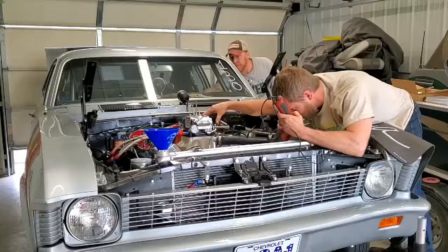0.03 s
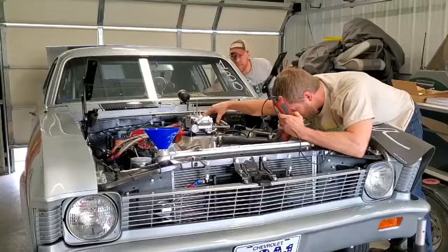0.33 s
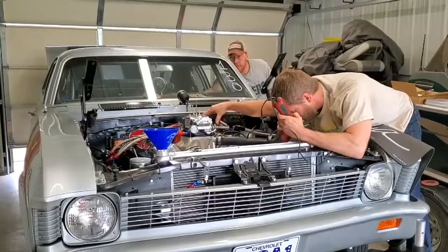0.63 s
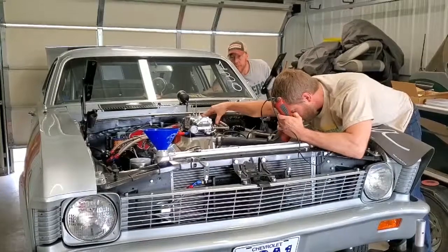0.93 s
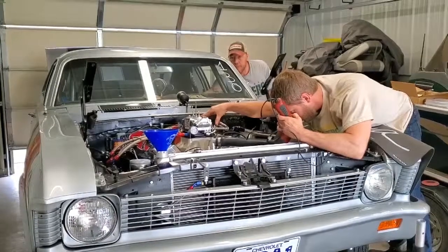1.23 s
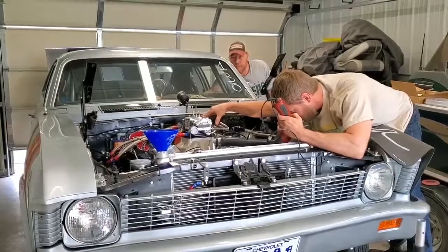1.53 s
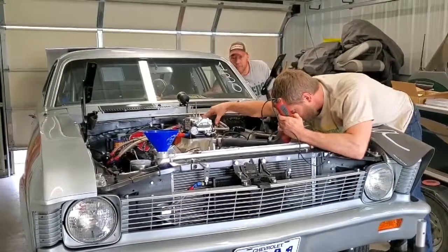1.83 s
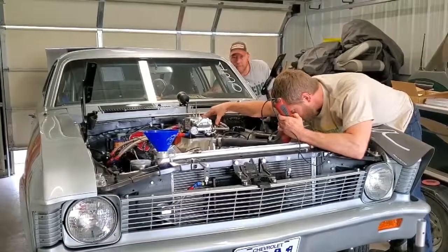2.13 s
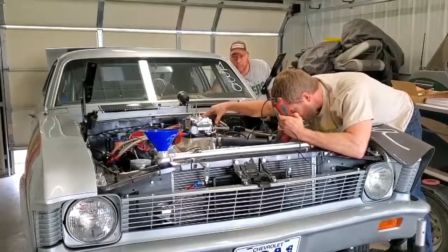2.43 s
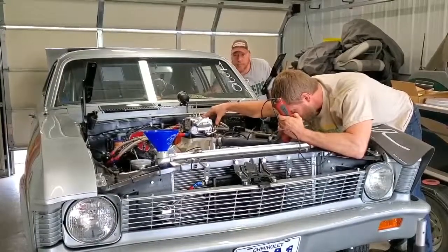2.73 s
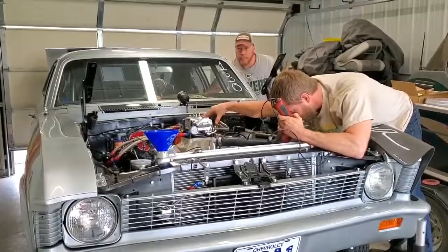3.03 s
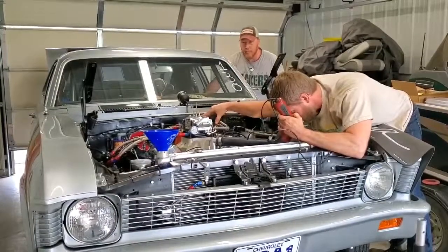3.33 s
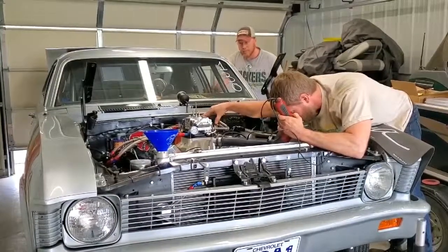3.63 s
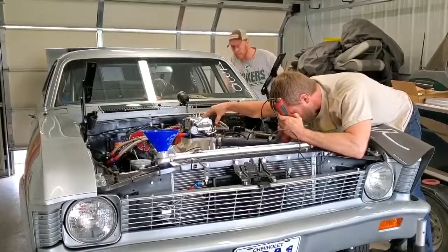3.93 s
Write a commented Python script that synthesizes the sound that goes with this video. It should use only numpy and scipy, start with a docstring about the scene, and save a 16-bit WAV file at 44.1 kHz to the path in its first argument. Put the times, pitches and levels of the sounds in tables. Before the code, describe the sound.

A big V8 car engine starts in a closed garage. The starter clashes in and grinds briefly, then the engine catches and runs loud and lumpy, with deep exhaust booms, hissing intake air and clattering valves nearby.

```python
"""A closed garage, in front of the open bonnet: a big V8 is started.
The pinion clashes in and the starter grinds through a few compressions, ringing the bell housing.
The engine catches, throws the pinion free and runs lumpily on a hand-worked throttle.
Uneven firings boom and bark in the pipes, the open carburettor hisses, the valve gear clatters."""
import sys
import numpy as np
from scipy import signal
from scipy.fft import rfft, irfft
from scipy.io import wavfile
from scipy.ndimage import uniform_filter1d

SR = 44100
rng = np.random.default_rng(int(sys.argv[2]) if len(sys.argv) > 2 else 0)


def log_audio(samples):
    """Write samples as a 16-bit WAV file to the path given in sys.argv[1]."""
    # one column per channel
    frames = np.atleast_2d(samples).T
    # limit to full scale, then quantise
    limited = np.clip(frames, -1, 1)
    pcm = np.round(limited * 32767).astype(np.int16)
    wavfile.write(sys.argv[1], SR, pcm)


N = 176400

# garage air (frequency [Hz], gain [dB])
AIR_SPECTRUM = [(25, -40), (62, 10.5), (130, -1.5), (400, 0.5), (1400, -8.5), (2800, -8), (4500, -16.5),
                (6900, -13.5), (10000, -27)]
# side re mid (frequency [Hz], gain [dB])
STEREO_WIDTH = [(60, -25), (250, -17.5), (500, -7), (1200, -0.5)]
# left re right (frequency [Hz], gain [dB])
STEREO_BALANCE = [(600, -1), (1200, 0.5), (2200, -3), (4000, -0.5), (6900, -6.5), (9000, -2), (11500, 1.5)]

# valve gear (frequency [Hz], gain [dB])
CLATTER_SPECTRUM = [(300, -9.5), (450, 1), (600, -3.5), (950, 0), (1400, -2), (1700, -.5), (2050, -4.5),
                    (2500, .5), (3300, 1), (3950, -9), (4600, -7), (6000, -2.5), (12000, -37.5)]
# intake air (frequency [Hz], gain [dB])
HISS_SPECTRUM = [(3000, -36), (4500, -15), (5700, -16), (6500, -6.5), (7200, -1.5), (8000, -10.5),
                 (10200, -17.5), (11500, -11), (13000, -17)]
# intake hiss (time [s], level [dB])
HISS_LEVEL = [(1.36, -52), (1.41, -21.5), (1.5, -32), (1.77, -34.5), (1.95, -27.5), (2.24, -26.5),
              (2.37, -38), (2.53, -26.5), (2.76, -30.5), (2.87, -38), (2.92, -30), (3.45, -27.5),
              (3.85, -31.5)]
# throttle whistles (time [s], level [dB], pitch [Hz], decay [s])
WHISTLES = [(1.787, -14.5, 7250, 0.04), (2.983, -18.5, 7600, 0.04)]

# starter under load (time [s], level [dB])
GRIND_LEVEL = [(0.515, -45), (0.546, -20.5), (0.59, -19.5), (0.66, -22.5), (0.77, -22.5), (0.846, -29),
               (0.9, -20.5), (0.94, -21), (0.992, -25.5), (1.012, -17), (1.05, -15.5), (1.08, -22.5),
               (1.15, -30), (1.26, -22), (1.29, -16), (1.45, -23)]
# starter spun by the engine (time [s], level [dB])
OVERRUN_LEVEL = [(1.2, -34), (1.29, -33.5), (1.4, -23), (1.47, -27), (1.54, -27.5), (1.74, -27.5),
                 (1.79, -36), (1.9, -59)]
# starter motor (time [s], pitch [Hz], level [dB])
MOTOR_WHINE = [(0.55, 950, -42), (0.75, 940, -34), (0.98, 985, -40), (1.04, 1000, -25), (1.1, 985, -33),
               (1.21, 975, -38), (1.3, 1025, -29)]
# bell housing (frequency [Hz], width [Hz], gain [dB])
HOUSING_MODES = [(980, 33, -1), (1265, 50, 5), (1617, 72, 7), (2286, 110, 10.5), (2510, 64, 10),
                 (2650, 37, -7), (2980, 86, -1)]
# loaded teeth (frequency [Hz], gain [dB])
GRIND_SPECTRUM = [(150, -14.5), (260, -1), (450, -10.5), (650, -7.5), (1000, 0.5), (1500, -3), (3500, 0.5),
                  (4100, -17), (9000, -32)]
# scraping teeth (frequency [Hz], gain [dB])
SCRAPE_SPECTRUM = [(2500, -12.5), (4200, -0.5), (5700, -2), (6700, 4), (8000, -6), (9500, -13.5),
                   (11300, -6), (13000, -22)]
# free-spinning teeth (frequency [Hz], gain [dB])
OVERRUN_SPECTRUM = [(500, -18), (1900, -0.5), (2500, 6), (3500, 9), (4000, 4), (5700, 4.5), (6800, 10.5),
                    (8200, -10.5), (13000, -58)]

# exhaust puffs while cranking (time [s], length [s], level [dB])
CRANKING_PUFFS = [(0.577, 0.25, -31.5), (0.84, 0.17, -37.5), (1.017, 0.16, -28), (1.152, 0.27, -37),
                  (1.3, 0.21, -24.5)]
# rush of a puff (frequency [Hz], gain [dB])
PUFF_SPECTRUM = [(20, -34), (45, 16), (100, 4.5), (400, -32.5)]
# engine speed (time [s], firing rate [Hz])
FIRING_RATE = [(1.4, 66), (1.5, 72), (1.58, 62), (1.7, 66), (1.94, 68), (2.09, 72), (2.25, 85),
               (2.38, 71.3), (2.5, 66), (2.6, 85), (2.7, 90), (2.91, 73), (3.03, 66.9), (3.2, 74),
               (3.35, 80), (3.86, 82), (4.0, 75)]
# eight cylinders in firing order (strength [dB])
CYLINDER_DB = [0.5, -6, -1, -3.5, -8, 1, -9, -1]
# exhaust boom (time [s], level [dB])
BOOM_LEVEL = [(1.38, -27), (1.43, -22), (1.5, -8), (1.54, -22), (1.73, -16.5), (1.78, -31), (1.83, -16),
              (1.89, -24), (2.03, -9.5), (2.13, -17), (2.18, -9.5), (2.29, -13), (2.33, -21), (2.39, -12),
              (2.44, -21), (2.51, -11.5), (2.78, -12), (2.82, -24), (2.93, -10.5), (3.0, -14), (3.1, -7.5),
              (3.15, -14), (3.29, -11), (3.78, -12), (3.85, -18), (3.92, -10)]
# firing force, heard as bark (time [s], level [dB])
BARK_LEVEL = [(1.28, -41), (1.42, -27), (1.49, -18), (1.57, -20.5), (1.68, -31), (1.88, -33), (2.06, -19),
              (2.18, -22), (2.28, -19), (2.33, -28), (2.43, -30), (2.52, -25), (2.575, -13), (2.65, -17.5),
              (2.78, -18), (2.86, -27), (3.0, -27), (3.08, -23), (3.78, -21), (3.85, -25), (3.93, -17.5)]
# room/body resonance drone near 251 Hz (time [s], level [dB])
DRONE_LEVEL = [(1.44, -44), (1.55, -19), (1.95, -47), (2.28, -31), (2.4, -47), (2.75, -12.5), (3.0, -39),
               (3.43, -21), (3.66, -34.5), (3.78, -13), (3.87, -40)]
# firing thump (frequency [Hz], gain [dB])
THUMP_SPECTRUM = [(26, -1), (33, -30), (40, -15.5), (62, -1.5), (85, -6.5), (140, -13.5), (300, -68)]
# exhaust pipes (frequency [Hz], gain [dB])
PIPE_SPECTRUM = [(60, -37.5), (105, -12.5), (135, -6.5), (180, 4.5), (222, -3), (265, 1), (320, -8.5),
                 (380, -16), (450, -12), (570, -23.5), (900, -14.5), (2500, -70)]

ROOM_T60_S, ROOM_DELAY_S, ROOM_DRIFT_HZ = 0.2, 0.0033, 2.2
BAY_WET_DB, STARTER_WET_DB, EXHAUST_WET_DB = 8, -1, 3.5
CLATTER_DB, CLATTER_DB_PER_DB, HISS_DB = -27.5, 0.28, 7
WHISTLE_WIDTH_HZ, WHISTLE_ATTACK_S = 620, 0.006
TOOTH_HZ, TOOTH_SAG_HZ_PER_DB, OVERRUN_TOOTH_HZ = 293.5, 7.5, 537
GRIND_DB, OVERRUN_DB, HOUSING_DB, SCRAPE_DB, SCRAPE_DB_PER_DB = 0.5, 6.5, -7, -28, 1.28
CLASH_DB, CLANG_DB = -21.5, -25
PUFF_HZ, DRONE_HZ, FIRING_JITTER_CYCLES = 72.6, 252.3, 0.08
TONE_DB, LOPE_DB, THUMP_DB, BARK_DB, DRONE_DB = -9.5, 4.5, -3, -2, -2.5
LOW_CUT_HZ, HIGH_CUT_HZ = 28, 13100
TIME_S = np.arange(N) / SR


def undb(db):
    """Decibels to gain."""
    return 10 ** (np.asarray(db) / 20)


def unit(x):
    """Scale to rms 1."""
    return x / np.sqrt(np.mean(x ** 2))


def curve(rows):
    """Linear interpolation of (time [s], value) rows."""
    return np.interp(TIME_S, *np.array(rows).T)


def gate(start_s):
    """Open over 10 ms."""
    return np.clip((TIME_S - start_s) * 100, 0, 1)


def fader(rows):
    """Gain from (time [s], level [dB]) rows, silent before the first."""
    return undb(curve(rows)) * gate(rows[0][0])


def swell(start_s, length_s):
    """Rounded rise and fall."""
    return np.sin(np.pi * np.clip((TIME_S - start_s) / length_s, 0, 1)).clip(0) ** .5


def gains(spectrum):
    """Gain per FFT bin from (frequency [Hz], gain [dB]) rows."""
    hz, db = np.array(spectrum).T
    bin_hz = np.arange(N // 2 + 1) * SR / N
    return undb(np.interp(np.log(bin_hz + 1), np.log(hz), db))


def colour(x, spectrum):
    """Minimum-phase filter."""
    cepstrum = irfft(np.log(gains(spectrum)))
    return irfft(rfft(x) * np.exp(rfft(2 * cepstrum[:N // 2], N) - cepstrum[0]))


def ring(x, hz, width_hz):
    """One resonance, peak gain 1."""
    return signal.lfilter(*signal.iirpeak(hz, hz / width_hz, fs=SR), x)


def noise():
    """White noise, mid and side."""
    return rng.standard_normal((2, N))


def sine(hz):
    """Sine of moving pitch."""
    return np.sin(2 * np.pi * np.cumsum(hz) / SR)


def walk(rate_hz):
    """Smooth random drift, rms 1."""
    hold = int(SR / rate_hz)
    steps = np.repeat(rng.standard_normal(N // hold + 2), hold)
    return unit(uniform_filter1d(steps, hold)[:N])


def beats(hz, jitter_cycles, scatter_db, pattern_db=(0,)):
    """Uneven impulses at a moving rate, with a repeating strength pattern."""
    cycles = np.cumsum(hz) / SR
    beat = np.arange(int(cycles[-1]))
    timing, strength = rng.uniform(-1, 1, (4096, 2))[beat].T * np.sqrt(3)
    onsets = np.searchsorted(cycles, beat + jitter_cycles * timing).clip(0, N - 1)
    return np.bincount(onsets, undb(np.resize(pattern_db, len(beat)) + scatter_db * strength), N)


def bursts(pulses, decay_s, floor):
    """Noise that flares at each impulse and decays to a floor."""
    flare = unit(signal.lfilter([1], [1, -np.exp(-1 / (decay_s * SR))], pulses))
    return (flare + floor) * noise()


def garage(x, wet_db):
    """Direct sound plus dense echoes of a small hard room, drifting between two patterns."""
    t = np.arange(SR // 2) / SR
    decay = np.exp(-np.log(1000) * t / ROOM_T60_S) * (t > ROOM_DELAY_S)
    tails = rng.standard_normal((2, 2, len(t))) * decay
    tails /= np.sqrt(np.sum(tails ** 2, axis=2, keepdims=True))
    first, second = signal.fftconvolve(x * np.ones((1, 2, 1)), tails, axes=2)[..., :N]
    drift_rad = 2 * np.pi * ROOM_DRIFT_HZ * TIME_S
    echoes = np.cos(drift_rad) * first + np.sin(drift_rad) * second
    return (x + undb(wet_db) * echoes) / np.hypot(1, undb(wet_db))


def air(level_db=-41.5, start_s=0.148):
    """Steady low rush of the garage."""
    return unit(colour(noise(), AIR_SPECTRUM)) * undb(level_db) * (TIME_S > start_s)


def valve_gear(firing_hz):
    """Valves tick twice per firing, louder as the firing force rises."""
    ticks = bursts(beats(2 * firing_hz, jitter_cycles=0.12, scatter_db=9.5), decay_s=0.0019, floor=1)
    force_db = curve(BARK_LEVEL)
    level_db = CLATTER_DB + CLATTER_DB_PER_DB * (force_db - np.mean(force_db[N // 2:]))
    running = np.interp(TIME_S, [1.3, 1.5], [0, 1])
    return unit(colour(ticks, CLATTER_SPECTRUM)) * undb(level_db) * running


def carburettor(firing_hz):
    """Each intake stroke sucks air; the throttle plates whistle as they close to a slit."""
    strokes = beats(firing_hz, FIRING_JITTER_CYCLES, scatter_db=3.5)
    suction = bursts(strokes, decay_s=0.3 / np.mean(firing_hz), floor=0.13)
    intake = unit(colour(suction, HISS_SPECTRUM)) * fader(HISS_LEVEL) * undb(HISS_DB)
    for start_s, db, hz, decay_s in WHISTLES:
        attack = np.clip((TIME_S - start_s) / WHISTLE_ATTACK_S, 0, 1)
        decay = np.exp(-np.maximum(TIME_S - start_s - WHISTLE_ATTACK_S, 0) / decay_s)
        whistle = ring(ring(suction, hz, WHISTLE_WIDTH_HZ), hz, 2 * WHISTLE_WIDTH_HZ)
        intake += undb(db) * attack * decay * unit(whistle)
    return intake


def puffs():
    """Pumped air and the first weak firings swell the low pipe note."""
    envelope = sum(undb(db) * swell(start_s, length_s) for start_s, length_s, db in CRANKING_PUFFS)
    note = unit(sine(PUFF_HZ * (1 + 0.0786 * walk(26.2))))
    rush = unit(colour(noise(), PUFF_SPECTRUM))
    return envelope * (note + undb(-1) * rush)


def gears(tooth_hz, spectrum):
    """Pinion teeth strike the ring gear and ring the housing; returns (teeth, housing)."""
    strikes = bursts(beats(tooth_hz, jitter_cycles=0.047, scatter_db=2), decay_s=0.0027, floor=0.12)
    housing = sum(undb(db) * ring(strikes, hz, width_hz) for hz, width_hz, db in HOUSING_MODES)
    return unit(colour(strikes, spectrum)), undb(HOUSING_DB) * unit(housing)


def pinion_grind():
    """The pinion clashes in, then slows and grinds at each compression."""
    grind_db = curve(GRIND_LEVEL)
    load_db = grind_db - np.mean(np.array(GRIND_LEVEL)[1:, 1])
    onset = gate(GRIND_LEVEL[0][0])
    tooth_hz = TOOTH_HZ - TOOTH_SAG_HZ_PER_DB * load_db
    mesh = sum(gears(tooth_hz, GRIND_SPECTRUM))
    grind = unit(garage(mesh, STARTER_WET_DB)) * onset * undb(grind_db + GRIND_DB)
    clash = swell(start_s=0.5194, length_s=0.1) ** 2
    pressure = onset * undb(SCRAPE_DB + SCRAPE_DB_PER_DB * load_db)
    teeth, _ = gears(tooth_hz, SCRAPE_SPECTRUM)
    scrape = unit(garage(teeth, STARTER_WET_DB)) * np.hypot(pressure, undb(CLASH_DB) * clash)
    clang = unit(ring(noise(), hz=2530, width_hz=51)) * undb(CLANG_DB) * clash
    return grind + scrape + clang


def pinion_overrun():
    """The engine spins the unloaded pinion: a fast whirr."""
    teeth, housing = gears(OVERRUN_TOOTH_HZ * (1 + 0.092 * walk(15)), OVERRUN_SPECTRUM)
    whirr = unit(garage(teeth + undb(-8) * housing, STARTER_WET_DB))
    return whirr * fader(OVERRUN_LEVEL) * undb(OVERRUN_DB)


def motor_whine(flutter_db=4):
    """The starter motor whines, wavering in pitch and level."""
    pitch_hz = curve([(s, hz) for s, hz, db in MOTOR_WHINE]) * (1 + 0.022 * walk(45))
    whine = sine(pitch_hz) * undb(flutter_db * walk(39.92))
    return unit(garage(whine, STARTER_WET_DB)) * fader([(s, db) for s, hz, db in MOTOR_WHINE])


def starter():
    """Grind and whine give way to the whirr as the engine catches."""
    grind, whirr, whine = pinion_grind(), pinion_overrun(), motor_whine()
    loaded = np.interp(TIME_S, [1.37, 1.5], [1, 0])
    return (grind + whine) * loaded + whirr


def exhaust(firing_hz):
    """The firing note booms, uneven cylinders thump and bark, a resonance drones."""
    firings = beats(firing_hz, FIRING_JITTER_CYCLES, scatter_db=3, pattern_db=CYLINDER_DB)
    tone = unit(sine(firing_hz) * undb(LOPE_DB * walk(28)))
    thump = unit(colour(firings, THUMP_SPECTRUM))
    boom = (undb(TONE_DB) * tone + undb(THUMP_DB) * thump) * fader(BOOM_LEVEL)
    blows = firings ** 0.55  # evens out the strengths
    gas = unit(blows) + undb(4.5) * unit(bursts(blows, decay_s=0.0016, floor=0.044))
    bark = unit(colour(garage(gas, EXHAUST_WET_DB), PIPE_SPECTRUM)) * fader(BARK_LEVEL)
    drone = unit(sine(DRONE_HZ * (1 + 0.0175 * walk(30)))) * fader(DRONE_LEVEL)
    return boom + undb(BARK_DB) * bark + undb(DRONE_DB) * drone


def scene():
    """Mid/side mix to stereo: bass shared, treble diffuse and leaning right."""
    firing_hz = curve(FIRING_RATE) * (1 + 0.035 * walk(24))  # crank wobble
    mix = starter() + puffs() + exhaust(firing_hz)
    mix += garage(valve_gear(firing_hz) + carburettor(firing_hz), BAY_WET_DB)
    mid, side = rfft(mix + air())
    side *= gains(STEREO_WIDTH)
    balance = gains(STEREO_BALANCE)
    left_right = np.array([(mid + side) * balance, mid - side])
    return irfft(left_right * np.sqrt(2 / (1 + balance ** 2)))


def record(dry):
    """Low cut, clip at full scale, high cut."""
    low_cut = signal.butter(3, LOW_CUT_HZ, "highpass", fs=SR, output="sos")
    high_cut = signal.ellip(12, .1, 70, HIGH_CUT_HZ, fs=SR, output="sos")
    clipped = np.clip(signal.sosfilt(low_cut, dry), -1, 1)
    return signal.sosfilt(high_cut, clipped)


dry = scene()
out = record(dry)
log_audio(out)
```